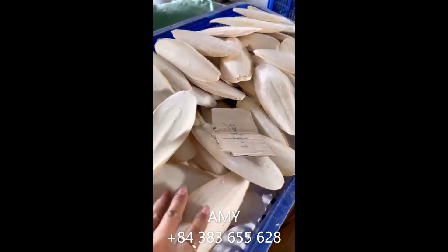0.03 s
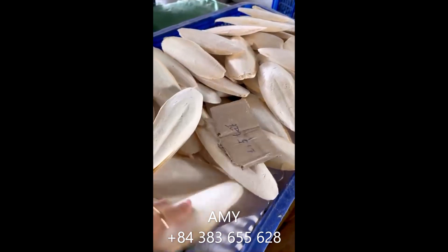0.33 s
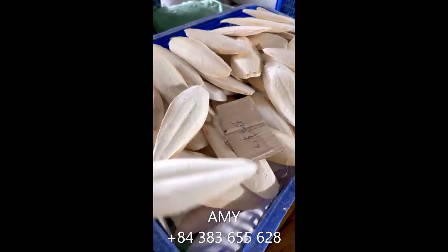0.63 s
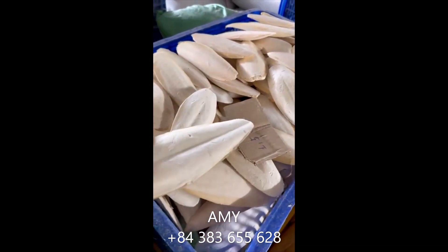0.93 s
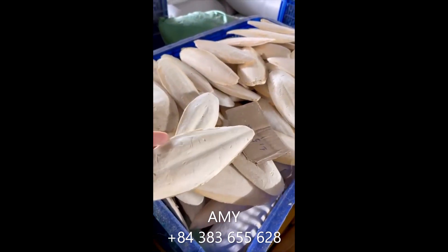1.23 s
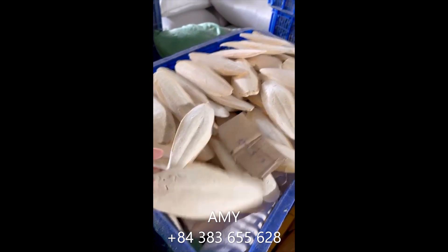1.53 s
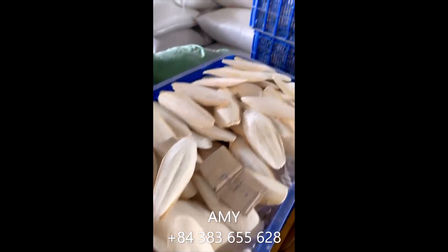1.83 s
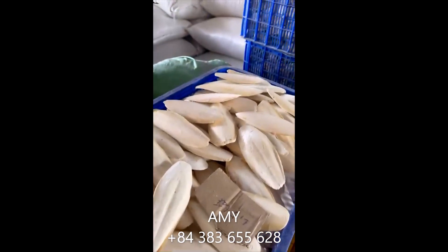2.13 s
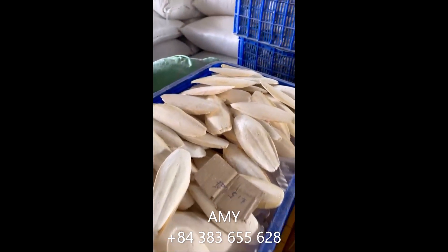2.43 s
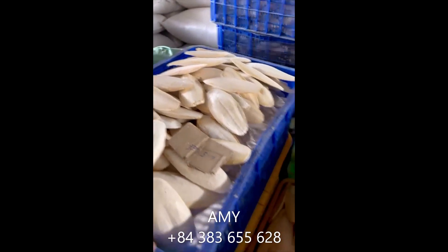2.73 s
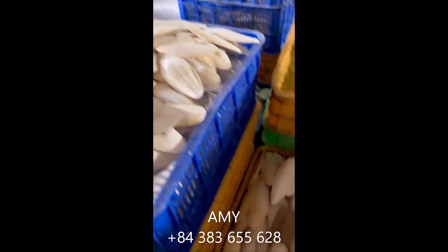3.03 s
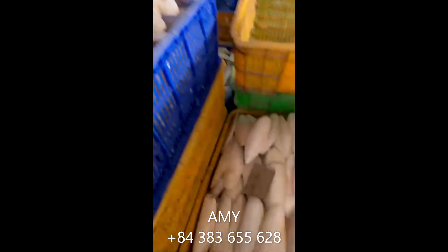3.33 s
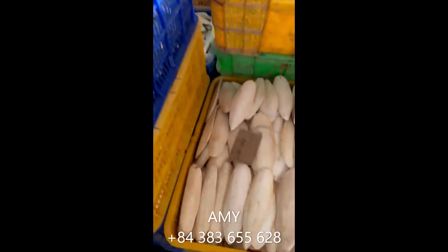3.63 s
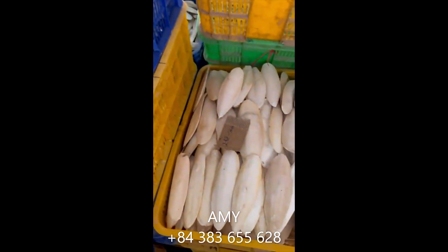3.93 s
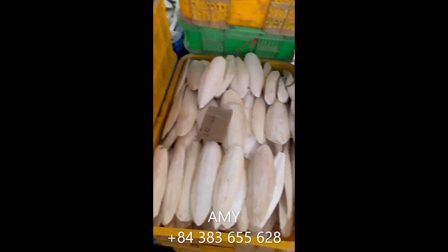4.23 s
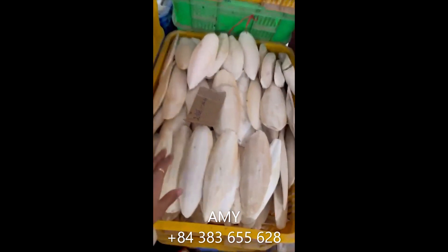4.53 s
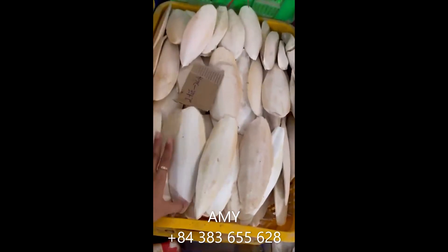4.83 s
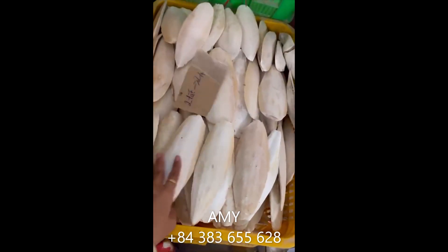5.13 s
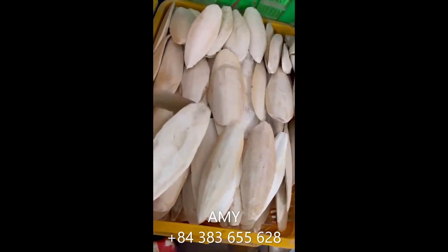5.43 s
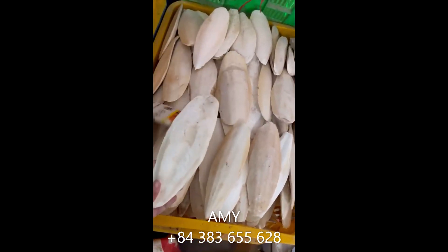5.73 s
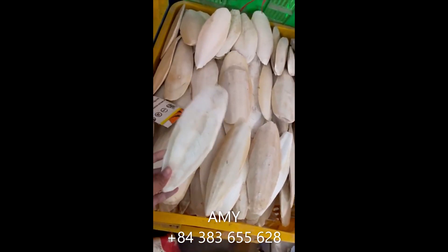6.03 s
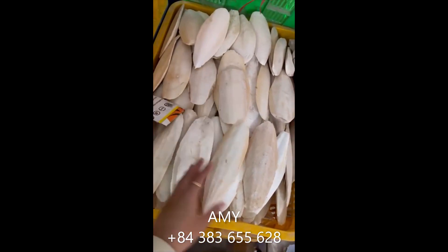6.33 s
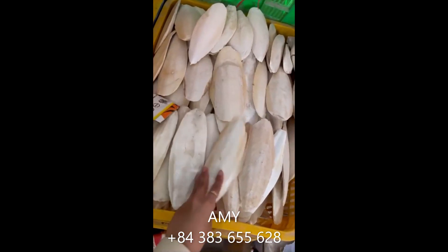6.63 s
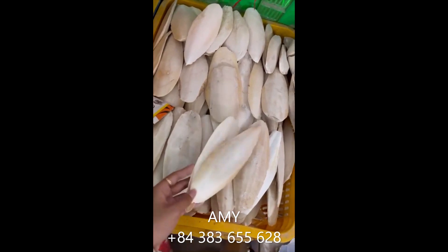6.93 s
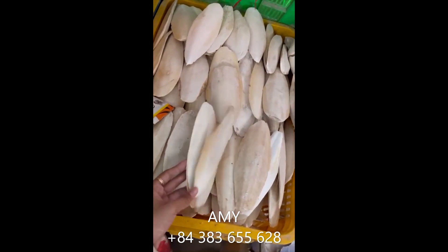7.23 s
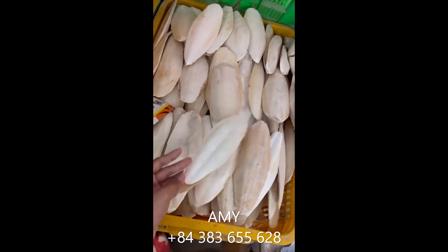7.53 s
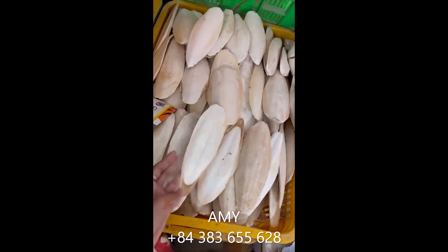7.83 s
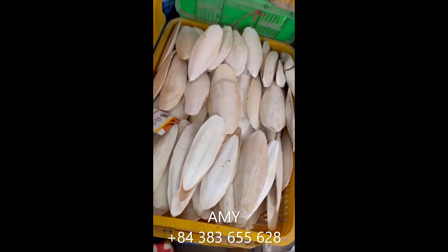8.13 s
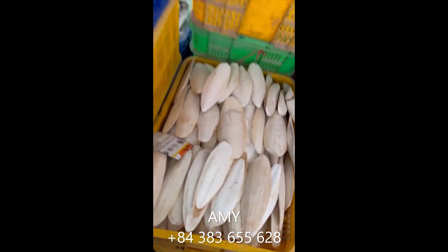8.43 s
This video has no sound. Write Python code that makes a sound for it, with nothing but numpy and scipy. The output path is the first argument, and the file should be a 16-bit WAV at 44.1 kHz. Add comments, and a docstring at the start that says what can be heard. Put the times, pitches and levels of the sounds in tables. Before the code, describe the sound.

Gritty scraping and a few brittle clicks open as cuttlebones are shifted in a crate. Fingers brush softly past during a lull, then light taps and the scrape of a cardboard tag lead into sharper, hollow knocks of bone on bone, each with a chalky crunch. The small store room adds a faint echo and a distant machine hum. The hand-held stereo microphone catches a low grip rustle at the end.

```python
"""Dry cuttlebones rasp over each other and drop with short, hollow clacks as a hand picks through plastic crates.
Each bone is a light, chalky plate: a knock makes it ring and crunch, and a rub makes it rasp and shed crumbs.
Fingers brush past, a nail flicks a rim and a cardboard tag scrapes. The crate and a quiet store room echo
faintly, and a machine hums somewhere. A hand-held stereo microphone dips in level at the hardest blows."""
import sys
import numpy as np
from scipy import signal
from scipy.fft import rfft, irfft, next_fast_len
from scipy.io import wavfile
from scipy.ndimage import uniform_filter1d, minimum_filter1d, map_coordinates

SR = 44100
rng = np.random.default_rng(int(sys.argv[2]) if len(sys.argv) > 2 else 0)


def store_pcm(level_fs):
    """Save levels as 16-bit WAV."""
    pcm = np.round(np.clip(level_fs, -1, 1) * 32767).astype(np.int16)
    wavfile.write(sys.argv[1], SR, np.atleast_2d(pcm).T)


N = 383669

# tones of a machine heard through the building: f/Hz, half-width/Hz, level/dB
MACHINE_TONES = [(95.4, 5.1, -8), (146.1, 7.4, 1.5), (195, 8, -6.5), (239.9, 7.1, -4), (273.6, 24.7, -8),
                 (361.3, 23, -11.5), (449, 130, -12.5)]
# how loud the background is over time: t/s, hum level/dB, rumble level/dB, air level/dB
BACKGROUND_LEVELS = [(0, -39, -46.5, -51.5), (1.7, -36.5, -46.5, -50), (2.7, -39.5, -44, -49.5),
                     (3.2, -42.5, -43, -53), (5.8, -45.5, -45, -54.5), (7.2, -44.5, -43, -54.5),
                     (8.7, -44, -43, -50)]
# the hand shifts its grip on the microphone: t/s, level/dB, swell time/s
GRIP_SHIFTS = [(8.31, -31.5, 0.026), (8.66, -36.5, 0.1)]
# tone colours of the building's rumble, the air's hiss and the shifting grip: f/Hz, level/dB
RUMBLE_COLOUR = [(20, -51), (31, -2), (41, -0.5), (75, 2.5), (115, -4), (160, 1.5), (210, -4), (265, -11),
                 (320, -14), (480, -15.5), (900, -23.5), (1500, -38), (3300, -100)]
AIR_COLOUR = [(300, -3), (700, 15.5), (1200, 8.5), (2000, 3), (5000, -1), (8000, -1.5), (10600, 5.5),
              (11200, 4.5), (11900, -54), (14000, -58)]
GRIP_COLOUR = [(20, -36), (42, 4.5), (60, 13), (100, -3), (160, -1), (230, -24), (600, -41), (3000, -100)]
# base echo length, scaled for crate and room (t60 is the time to fade by 60 dB): f/Hz, t60/s
ECHO_FADES = [(200, 0.41), (2000, 0.18), (5000, 0.33), (11000, 0.28)]
# how alike left and right are for sound from all around: f/Hz, likeness/0-1
STEREO_LIKENESS = [(200, 1), (350, 0.76), (600, 0.065), (1200, 0.59), (1900, 0.95), (3500, 0.1), (6000, 1),
                   (7400, 1), (9000, 0.99), (11000, 1)]
# how far the microphone's left opening leads the right one: f/Hz, phase/rad
LEFT_LEAD = [(20, 0), (1800, 0.03), (2400, 0.3), (3000, 1.7), (4100, 0.9), (4900, 3.3), (5500, 5.9),
             (6800, 6.9), (8100, 9), (9700, 9.7), (11500, 12), (16000, 13)]

# fingers and sleeve brush past: start/s, end/s, pressure peak/0-1 of stroke, level/dB, tilt/dB per octave
SOFT_BRUSHES = [(0.949, 1.012, 0.45, -43, 5), (0.979, 1.454, 0, -52.5, -7), (1.044, 1.106, 0.3, -50, -7),
                (1.17, 1.203, 0.3, -46.5, -11), (1.927, 2.095, 0.23, -48, -3),
                (2.525, 2.972, 0.14, -42, -9.5), (2.798, 2.93, 0.44, -43.5, 0), (2.858, 3.13, 0, -49, -9.5),
                (3.103, 3.176, 0.05, -41.5, 15), (3.331, 3.462, 0.9, -57, -8.5),
                (4.242, 4.278, 0.6, -39.5, -1), (7.541, 7.74, 0.1, -48.5, -1)]
# the cardboard price tag scrapes the bones: start/s, end/s, pressure peak/0-1 of stroke, level/dB
TAG_SCRAPES = [(5.03, 5.173, 0.04, -40), (5.187, 5.396, 0.47, -39), (5.318, 5.353, 0.35, -31.5),
               (5.424, 5.522, 0, -38.5)]
# a bone skids on the pile: start/s, end/s, pressure peak/0-1 of stroke, rasp/dB, f/Hz, grit/dB
BONE_DRAGS = [(0, 0.133, 0, -41, 1800, -35), (0.121, 0.21, 0.9, -42, 1960, -39),
              (0.228, 0.531, 0.4, -41.5, 1840, -35.5), (1.548, 1.908, 0.53, -46, 1800, -44.5),
              (4.743, 4.926, 0.37, -49.5, 1800, -44.5), (6.228, 6.243, 0.3, -24.5, 2900, -30),
              (6.502, 6.547, 0.08, -36, 1780, -47), (6.535, 6.581, 0.27, -37, 1730, -47),
              (6.607, 6.678, 0.3, -46, 1750, -50.5), (6.67, 6.718, 0.56, -32, 1720, -36.5),
              (6.778, 6.882, 0.5, -43.5, 1850, -38.5)]
# hollow tones of a bone pressed flat on the pile: multiple of its pitch, width/Hz, level/dB
RUBBED_TONES = [(0.4, 2300, -2), (0.682, 160, 4.5), (1, 230, 3.5), (1.418, 218, 2), (1.75, 518, -0.5),
                (2.4, 2560, -27.5)]
# tone colours of surface grit, a nail tick and crushed chalk: f/Hz, level/dB
GRIT_COLOUR = [(2000, -14.5), (4200, -1.5), (6200, 3), (7600, 1.5), (9000, 6), (10800, 9.5), (11500, 3.5),
               (12300, -60), (14000, -72)]
NAIL_COLOUR = [(500, -55), (3000, -12), (6000, -7), (8000, 5), (10000, 15), (11500, -4), (13000, -9),
               (16000, -22)]
CRUNCH_COLOUR = [(2500, -10), (4300, -8), (5000, -5), (6100, -4.5), (7500, -6), (9000, 5.5), (10800, -1),
                 (11500, -9), (12300, -42), (14000, -67.5)]
# a fingernail flicks a hard rim: t/s, level/dB
NAIL_FLICKS = [(0.4762, -16.5), (0.4802, -27), (0.4915, -24), (0.498, -18.5), (0.5058, -30), (0.5135, -33)]
# a bone's glassy rim catches and rings: t/s, level/dB, f/Hz, t60/s
RIM_CATCHES = [(0.0388, -40, 2770, 0.005), (0.136, -36, 7800, 0.002), (0.1462, -36, 5430, 0.003),
               (0.172, -35, 4430, 0.0038), (0.2495, -43, 3480, 0.005), (0.2882, -40, 3300, 0.004),
               (0.3577, -37, 6690, 0.002), (0.5382, -13, 2850, 0.0086), (0.5388, -27.5, 4100, 0.006),
               (0.538, -27, 5650, 0.013), (1.6885, -26.5, 6000, 0.0032), (4.2446, -35, 2590, 0.018),
               (4.7722, -54.5, 2710, 0.005), (4.8215, -58, 5960, 0.002), (5.0406, -49, 2650, 0.005),
               (5.046, -46, 2820, 0.005), (5.2293, -35, 5140, 0.005), (5.301, -35.5, 3930, 0.0024),
               (5.4278, -43, 2600, 0.0088), (5.458, -43, 2600, 0.0054), (5.4913, -46, 3700, 0.004),
               (5.5, -46, 6220, 0.002), (6.2058, -21, 6200, 0.0033), (6.2417, -17.5, 3600, 0.008),
               (7.3047, -27.5, 4510, 0.0053), (7.4424, -22, 4900, 0.006), (7.8965, -16.5, 8820, 0.0036),
               (7.9563, -33.5, 5940, 0.0071)]
# the bones underneath ring on after a blow: f/Hz, width/Hz, level/dB
PILE_TONES = [(1825, 110, -4.5), (2180, 78, 3), (3230, 91, -21), (3250, 91, -31)]
# tones of a struck bone as it bends: multiple of its pitch, level/dB, t60/s
STRUCK_TONES = [(0.22, -28, 0.01), (0.36, -15, 0.016), (0.5, -5.5, 0.016), (0.641, -7, 0.021),
                (0.8, -2, 0.0087), (0.96, 3.5, 0.014), (1.13, 2.5, 0.0105), (1.33, -0.5, 0.0073),
                (1.56, -0.5, 0.0053), (1.9, -6, 0.0071)]
# bone hits bone: t/s, ring level/dB, f/Hz, crunch level/dB
BONE_HITS = [(0.0385, -31, 1960, -37), (0.044, -41, 2350, -25.5), (0.1483, -55, 3020, -39),
             (0.185, -35.5, 2340, -41), (0.202, -45, 2140, -35), (0.3574, -54, 2680, -22),
             (0.3727, -38, 2410, -30), (0.383, -38, 2080, -36), (0.393, -27.5, 2980, -30),
             (0.400, -37, 1940, -35), (0.433, -56, 2200, -45), (0.538, -13.5, 3390, -17.5),
             (0.55, -36, 3000, -33), (0.554, -39, 2890, -32.5), (0.608, -39.5, 1930, -28.5),
             (1.6746, -48, 2420, -34), (1.682, -32.5, 2120, -29), (1.6883, -28, 2550, -26.5),
             (1.7856, -41, 2930, -38), (1.8331, -35, 1640, -33), (1.8397, -32.5, 1960, -31.5),
             (1.884, -38, 2750, -27), (1.8948, -29, 3450, -34), (4.2437, -43, 2330, -33),
             (4.755, -46, 1960, -48), (4.787, -39, 1550, -41.5), (4.8222, -59, 2200, -36),
             (4.8528, -36, 1690, -54), (4.865, -46, 1790, -52), (4.883, -54, 2200, -35.5),
             (4.9333, -26.5, 1990, -30.5), (5.178, -50, 2400, -35.5), (5.2293, -45, 2070, -23.5),
             (5.3333, -30.5, 2340, -27), (5.428, -50, 1740, -30.5), (5.44, -35.5, 1660, -37),
             (5.459, -56, 1910, -39), (5.6507, -37.5, 1180, -35), (5.837, -31, 1230, -38),
             (5.886, -44.5, 1080, -48), (5.92, -51.5, 1160, -59), (6.2065, -28.5, 1750, -12.5),
             (6.2417, -5.5, 2790, -13.5), (6.2449, -11.5, 3000, -14), (6.3313, -29, 2340, -43),
             (6.5099, -35.5, 1860, -44), (6.616, -39.5, 1770, -60), (6.791, -69, 2300, -38),
             (6.851, -35, 2580, -29.5), (6.873, -46, 2420, -35.5), (6.9144, -41.5, 1810, -38.5),
             (7.3043, -27, 2500, -26), (7.3313, -32, 2030, -54), (7.3353, -30.5, 2670, -34),
             (7.4403, -8.5, 2505, -17.5), (7.442, -22, 3020, -24), (7.4475, -12.5, 2310, -24.5),
             (7.4488, -11, 2380, -19), (7.477, -21, 2300, -28.5), (7.5, -33, 1880, -50),
             (7.6455, -50, 1460, -37.5), (7.8965, -21, 2070, -15), (7.955, -17.5, 1790, -34)]

RUB_PITCH_HZ, DRAG_TILT_DB = 1810, -3.5  # a rubbed bone's usual pitch; its grit's treble gain per octave
HARD_HISS, SOFT_HISS = 0.82, 1.1  # amount of smooth hiss in hard and soft rubs


def amp(db):
    """Turn decibels into a gain."""
    return 10 ** (np.asarray(db) / 20)


def unit(x):
    """Scale to an average (rms) level of 1."""
    return x / np.sqrt(np.mean(x ** 2) + 1e-20)


def unit_hit(x):
    """Scale a short sound to the energy of 5 ms at level 1."""
    return x * np.sqrt(.005 * SR / np.sum(x ** 2))


def along(points, hz):
    """Read between (f/Hz, value) points on a musical (log) scale."""
    freqs, values = np.transpose(points)
    return np.interp(np.log(hz + 1), np.log(freqs + 1), values)


def curves(rows):
    """Stretch each column after the time to one value per sample."""
    times, *columns = np.transpose(rows)
    return [np.interp(np.arange(N) / SR, times, column) for column in columns]


def wobble(rate):
    """A smooth curve through `rate` random values a second."""
    return map_coordinates(rng.standard_normal(int(N * rate / SR) + 4), [np.arange(N) * rate / SR])


def add(track, s, sound):
    """Mix a sound into the track at s seconds."""
    part = track[max(round(s * SR), 0):][:len(sound)]
    part += sound[:len(part)]


def filtered(x, response):
    """Change the strength and phase of each frequency in x by response(hz)."""
    size = x.shape[-1]
    padded = next_fast_len(size + SR // 8)
    return irfft(rfft(x, padded) * response(np.fft.rfftfreq(padded, 1 / SR)), padded)[..., :size]


def coloured(x, colour, size=2048):
    """Give x a tone colour (f/Hz, level/dB) without smearing it earlier in time."""
    cepstrum = irfft(np.log(amp(along(colour, np.fft.rfftfreq(size, 1 / SR)))))
    fold = np.r_[1, np.full(size // 2 - 1, 2), np.zeros(size // 2)]  # puts all ringing after the start
    return signal.fftconvolve(x, irfft(np.exp(rfft(cepstrum * fold))))[:len(x)]


def diffuse(pair, colour):
    """Blend two unrelated signals into coloured sound from all around, partly alike in both ears."""
    turn = lambda hz: np.arccos(np.clip(along(STEREO_LIKENESS, hz), -1, 1)) / 2
    mid, side = filtered(pair, lambda hz: amp(along(colour, hz)) * [np.cos(turn(hz)), np.sin(turn(hz))])
    return np.array([mid + side, mid - side])


def machine_hum():
    """A far-off machine drones: each tone is a narrow band of noise."""
    hum = np.zeros(N)
    for centre, width, db in MACHINE_TONES:
        band = filtered(rng.standard_normal(N), lambda hz: 1 / (1 + ((hz - centre) / width) ** 2))
        hum += amp(db) * unit(band)
    return unit(hum)


def grip_noise():
    """The hand shifts on the microphone: low noise swells and fades."""
    t = np.arange(N) / SR
    swells = sum(amp(db) * np.exp(-np.abs(t - s) / swell) for s, db, swell in GRIP_SHIFTS)
    return swells * unit(filtered(rng.standard_normal(N), lambda hz: amp(along(GRIP_COLOUR, hz))))


def background(air_waver_db=3.0):
    """Machine hum, the building's rumble, a faint wavering hiss of air and the shifting grip."""
    hum_db, rumble_db, air_db = curves(BACKGROUND_LEVELS)
    hum = amp(hum_db) * machine_hum()
    rumble = amp(rumble_db) * unit(diffuse(rng.standard_normal((2, N)), RUMBLE_COLOUR))
    air = unit(diffuse(rng.standard_normal((2, N)), AIR_COLOUR))
    return hum + rumble + amp(air_db + air_waver_db * wobble(6.1)) * air + grip_noise()


def echo(x, t60_scale, delay_s, size):
    """Walls answer with a fading tail; hand and microphone move, so every `size` samples get a new one."""
    echoes = np.zeros((2, N + 2 * size))
    late = np.pad(x, (round(delay_s * SR), 0))
    starts = range(0, N, size)
    hz, t, noise = signal.stft(rng.standard_normal((len(starts), 2, size)), SR, nperseg=128)
    fade = amp(-60 * t / (t60_scale * along(ECHO_FADES, hz)[:, None]))
    tails = signal.istft(noise * fade, SR, nperseg=128)[1][..., :size]
    for start, tail in zip(starts, tails):
        answer = signal.fftconvolve(late[None, start:start + size], tail / np.linalg.norm(tail[0]), axes=1)
        echoes[:, start:start + answer.shape[1]] += answer
    return echoes[:, :N]


def bone_resonance(x, tones, damping_hz=5200):
    """Shaken by x, bone rings at its tones (f/Hz, width/Hz, level/dB); its pores soak up the treble."""
    def response(hz):
        body = sum((-1) ** k * amp(db) * 1j * hz * width / (centre ** 2 - hz ** 2 + 1j * hz * width)
                   for k, (centre, width, db) in enumerate(tones))
        return body / (1 + (hz / damping_hz) ** 8)
    return filtered(x, response)


def soft_strokes(rasp_db=-16):
    """Soft skin and cloth hardly stir the bones. Gives rows for rubs()."""
    return [(start, end, peak, db + rasp_db, RUB_PITCH_HZ, db, tilt_db, SOFT_HISS)
            for start, end, peak, db, tilt_db in SOFT_BRUSHES]


def scuff_strokes(before_s=0.008, after_s=0.026, rasp_db=-19.5, grit_db=-27):
    """A bone grazes its neighbour just before and after each hit. Gives rows for rubs()."""
    return [(s - before_s, s + after_s, .5, ring_db + rasp_db, RUB_PITCH_HZ,
             crunch_db + grit_db, DRAG_TILT_DB, HARD_HISS) for s, ring_db, _, crunch_db in BONE_HITS]


def hard_strokes(tag_rasp_db=-5.5, tag_tilt_db=5):
    """Bones drag over the pile, and the tag scrapes with a brighter sound. Gives rows for rubs()."""
    drags = [(*drag, DRAG_TILT_DB, HARD_HISS) for drag in BONE_DRAGS]
    scrapes = [(start, end, peak, db + tag_rasp_db, RUB_PITCH_HZ, db, tag_tilt_db, HARD_HISS)
               for start, end, peak, db in TAG_SCRAPES]
    return drags + scrapes


def grains(size, per_s, hiss, uneven_db=4):
    """A rough surface makes countless tiny catches, a few far bigger than the rest, over a smooth hiss."""
    strengths = rng.standard_normal(size) * amp(uneven_db * np.clip(rng.standard_normal(size), -2, 2))
    catches = rng.random(size) < per_s / SR
    return unit(catches * strengths) + hiss * rng.standard_normal(size)


def rubs(strokes, slip_db=2.0, drift_db=-0.4, firm_db=-48.0):
    """Pressure rises and falls in each stroke; sticking and slipping shake its hollow rasp and fine grit."""
    track, force = np.zeros((2, N))
    for start, end, peak, rasp_db, pitch_hz, grit_db, tilt_db, hiss in strokes:
        size = max(round((end - start) * SR), 256)
        rise_fall = np.interp(np.linspace(0, 1, size), [0, np.clip(peak, .02, .98), 1], [0, 1, 0])
        pressure = np.sin(rise_fall * np.pi / 2) ** 0.58  # a flattened arch
        tones = [(pitch_hz * ratio, width, db) for ratio, width, db in RUBBED_TONES]
        rasp = unit(bone_resonance(grains(size, per_s=600, hiss=0.7), tones))
        colour = [(hz, db + tilt_db * np.log2(hz)) for hz, db in GRIT_COLOUR]
        grit = unit(coloured(grains(size, per_s=1200, hiss=hiss), colour))
        add(track, start, pressure * (amp(rasp_db - 1) * rasp + amp(grit_db - 2.5) * grit))
        add(force, start, amp(rasp_db) * pressure)
    firmness = np.clip(force / amp(firm_db), 0, 1)  # a light touch glides evenly
    return track * amp(firmness * slip_db * wobble(170) + drift_db * wobble(6.8))


def crumbs(per_s=140, pitch_hz=3500, pitch_spread=0.58, scatter_db=7.0, cycles=1.4):
    """Under a hard rub chalky crumbs snap off at random, each ringing a cycle or two at its own pitch."""
    track, t = np.zeros(N), np.arange(SR // 200) / SR
    for start, end, _, _, _, grit_db, *_ in hard_strokes():
        times = start + np.cumsum(rng.exponential(size=90)) / per_s
        variations = np.clip(rng.standard_normal((len(times), 2)), -2, 2)
        for s, (detune, strength) in zip(times[times < end], variations):
            turns = pitch_hz * np.exp(pitch_spread * detune) * t
            snap = np.sin(2 * np.pi * turns) * np.exp(-turns / cycles)
            add(track, s, amp(grit_db - 1 + scatter_db * abs(strength)) * snap)
    return coloured(track, [(7000, -4.0), (11000, -6), (12500, -62)])


def burst(t, t60, attack_s):
    """A tiny crush of brittle chalk: noise that starts sharply and dies at once."""
    return rng.standard_normal(len(t)) * amp(-60 * t / t60) * (1 - np.exp(-t / attack_s))


def nail_flicks():
    """A fingernail ticks on a rim, too briefly to set the bone ringing."""
    track, t = np.zeros(N), np.arange(SR // 50) / SR
    for s, db in NAIL_FLICKS:
        tick = coloured(burst(t, t60=0.0024, attack_s=.0001), NAIL_COLOUR)
        add(track, s, amp(db) * unit_hit(tick))
    return track


def rim_ticks(attack_s=0.00018):
    """A rim is small and stiff, so it rings at one high pitch that dies quickly."""
    track, t = np.zeros(N), np.arange(SR // 40) / SR
    onset = 1 - np.exp(-(t / attack_s) ** 2)
    for s, db, pitch_hz, t60 in RIM_CATCHES:
        ring = np.sin(2 * np.pi * pitch_hz * t) * amp(-60 * t / t60)
        add(track, s, amp(db) * unit_hit(ring * onset))
    return track


def clacks(pitch_spread=0.03, scatter_db=2, phase_spread=0.3, contact_s=0.000371):
    """Each hit rings a light bone plate for a moment and crushes a little of its chalky face."""
    track, t = np.zeros(N), np.arange(SR // 20) / SR
    ratio, tone_db, t60 = np.transpose(STRUCK_TONES)[:, :, None]
    onset = 1 - np.exp(-(t / contact_s) ** 2)
    for s, ring_db, pitch_hz, crunch_db in BONE_HITS:
        detune, strength, phase = rng.standard_normal((3, len(STRUCK_TONES), 1))  # no two bones are alike
        hz = pitch_hz * ratio * np.exp(pitch_spread * detune)
        waves = np.sin(2 * np.pi * hz * (t - contact_s) + phase_spread * phase)
        fades = amp(tone_db + scatter_db * strength - 60 * t / t60)
        ring = (fades * waves).sum(0) * onset
        crunch = coloured(burst(t, t60=0.0042, attack_s=0.00025), CRUNCH_COLOUR)
        add(track, s, amp(ring_db) * unit_hit(ring) + amp(crunch_db) * unit_hit(crunch))
    return track


def scene(pile_db=-6, nail_left_db=2.4):
    """Bones and nail are heard directly, off the crate walls and faintly off the room; hits ring the pile."""
    store = background()
    rubbing = rubs(hard_strokes() + scuff_strokes() + soft_strokes())
    hits, nails = clacks(), nail_flicks()
    pile = amp(pile_db) * bone_resonance(hits, PILE_TONES)
    bones = hits + pile + rim_ticks() + rubbing + crumbs()
    crate = diffuse(echo(bones + nails, t60_scale=0.14, delay_s=0.00098, size=2048),
                    colour=[(400, -6.5), (3000, -4.5), (6000, -6.5), (11300, -3.0), (12500, -59)])
    room = diffuse(echo(bones + nails, t60_scale=0.89, delay_s=.008, size=12288),
                   colour=[(400, -29), (2000, -17.5), (3800, -16.5), (5500, -18),
                           (11300, -14.5), (12500, -56)])
    nails_on_left = nails * amp([[nail_left_db], [-nail_left_db]])
    return bones + nails_on_left + crate + room + store


def limiter(x, ceiling_db, hold_s, release_db_per_s):
    """Turn the level down just ahead of each too-loud peak, hold it there, then let it recover."""
    over_db = np.maximum(20 * np.log10(np.abs(x).max(0) + 1e-9) - ceiling_db, 0)
    span = max(round(hold_s * SR), 2)
    held_db = -minimum_filter1d(-over_db, span, origin=(span - 1) // 2)
    ramp_db = release_db_per_s * np.arange(N) / SR
    cut_db = np.maximum.accumulate(held_db + ramp_db) - ramp_db
    return x * amp(uniform_filter1d(minimum_filter1d(-cut_db, size=45), size=45))  # smoothed over 1 ms


def record(dry, top_hz=16800):
    """The microphone's two openings hear slightly out of step; peaks are limited and the top treble is cut."""
    left_right = filtered(dry, lambda hz: np.exp([[.5j], [-.5j]] * along(LEFT_LEAD, hz)))
    limited = limiter(left_right, ceiling_db=0, hold_s=0.11, release_db_per_s=86)
    return filtered(limited, lambda hz: 1 / (1 + (hz / top_hz) ** 100))


dry = scene()
out = record(dry)
store_pcm(out)
```